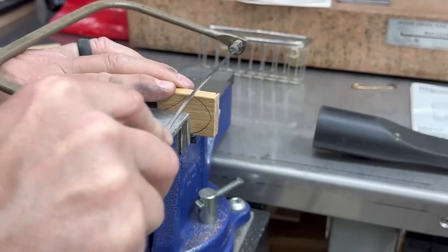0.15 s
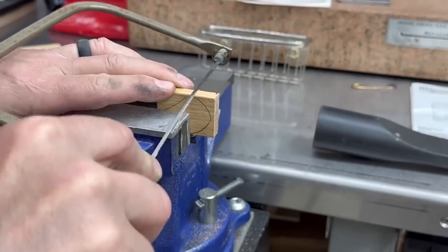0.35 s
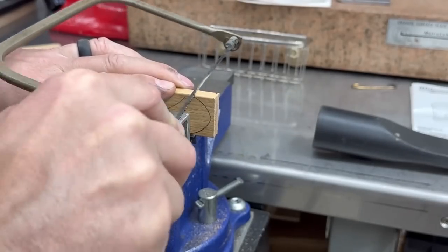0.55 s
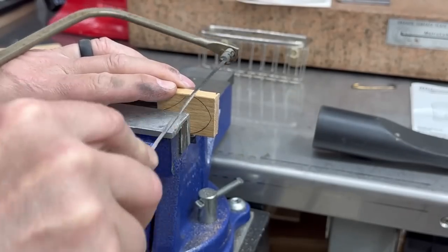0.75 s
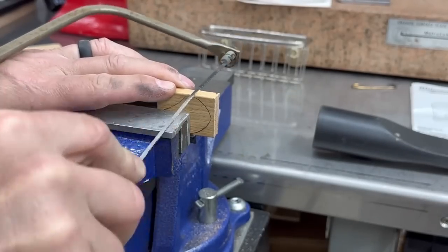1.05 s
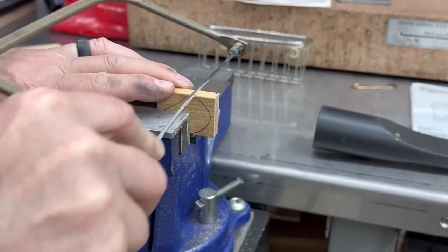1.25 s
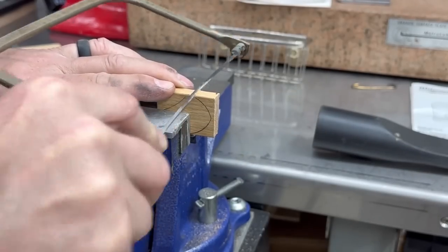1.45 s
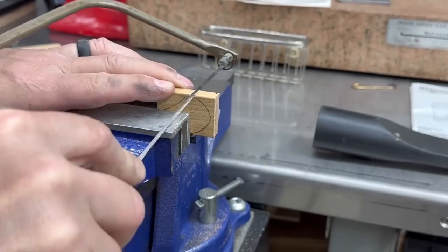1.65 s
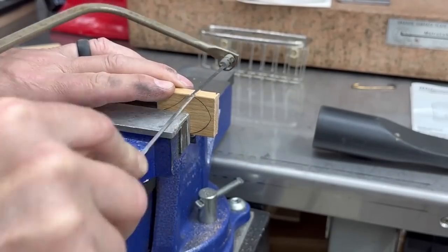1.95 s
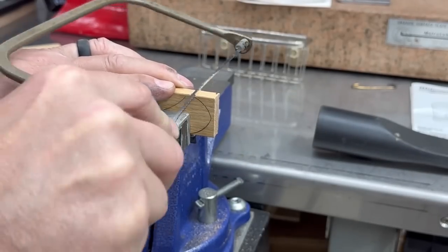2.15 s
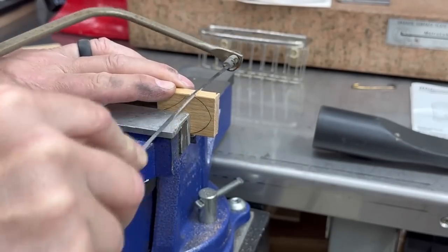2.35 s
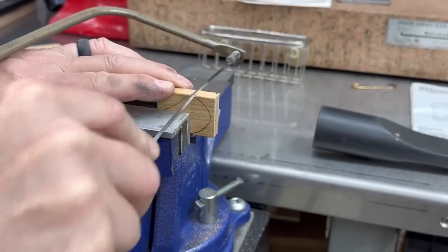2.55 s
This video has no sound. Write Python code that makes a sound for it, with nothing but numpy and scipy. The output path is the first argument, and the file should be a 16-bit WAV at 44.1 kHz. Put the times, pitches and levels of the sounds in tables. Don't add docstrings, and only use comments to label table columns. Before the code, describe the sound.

Fast, steady sawing of wood, already under way at the start: hissy, gritty rasps alternate slightly brighter and duller, growing a little louder, with a sharp fibre snap late on; close stereo, small dry workshop.

```python
import sys
import numpy as np
from scipy import signal
from scipy.fft import rfft, irfft
from scipy.io import wavfile
from scipy.ndimage import uniform_filter1d

SR = 44100
rng = np.random.default_rng(int(sys.argv[2]) if len(sys.argv) > 2 else 0)


def undo_db(level):
    steps = np.asarray(level, float) / 20
    return 10 ** steps


def int16_out(signal):
    q = np.round(np.clip(np.atleast_2d(signal).T, -1, 1) * 32767)
    wavfile.write(sys.argv[1], SR, q.astype(np.int16))


N = 119070

# frequency [Hz], level [dB].
RUMBLE_SPECTRUM = [(20, -48), (45, -6), (120, -0.5), (250, -6), (450, -21.5), (800, -25.5), (3500, -17.5),
                   (15000, -38)]
# frequency [Hz], likeness [0-1].
RUMBLE_LIKENESS = [(60, 1), (330, 0.91), (600, 0), (1500, 0.92), (5000, 0.98), (9000, 0.6)]
# start [s], level [dB], pitch [Hz].
BENCH_THUDS = [(0.039, -51.5, 99), (0.118, -56, 124), (.205, -50, 123), (0.275, -43, 94), (.555, -59, 110),
               (0.607, -44, 69), (0.646, -43.5, 150), (.791, -51.5, 118), (0.937, -54, 121),
               (1.256, -41.5, 121), (1.358, -45.5, 106), (1.567, -39, 117), (1.639, -46.5, 76.5),
               (1.899, -39.5, 120.5), (1.963, -47.5, 133), (2.211, -40, 121)]
# peak [s], rise [s], level [dB], pitch [Hz].
VISE_HUMS = [(.172, .04, -49.5, 236), (.525, .04, -50, 248), (0.68, .05, -49.5, 236),
             (0.859, .04, -50, 248.5), (0.938, .02, -49, 228), (1.011, .04, -47, 250),
             (1.187, .04, -48, 253.6), (1.313, .035, -44.5, 242.6), (1.5, .05, -48.5, 246.5),
             (1.574, .02, -52, 238), (1.637, .04, -47, 242), (1.92, .04, -52, 255.3), (2., .03, -52.5, 253),
             (2.162, .03, -51, 251.4), (2.25, .05, -46, 233.7), (2.312, .03, -62, 254),
             (2.482, .03, -50.5, 260), (2.567, .03, -53.5, 249.3), (2.615, .025, -53, 253)]
# start [s], length [s], level [dB].
FRAME_RINGS = [
    (0.982, 0.098, -57),
    (1.275, 0.13, -53.5),
]
# start [s], level [dB].
FIBRE_SNAPS = [
    (.329, -30),
    (.987, -29),
    (1.158, -29),
    (1.939, -17),
    (2.2, -29),
    (2.406, -28),
]
# start [s], length [s], level [dB], wood share [dB], low knock [dB].
SAW_STROKES = [(-.09, 0.13, -38, 1.5, 4), (.073, 0.13, -38, 0.5, 2.5), (.248, 0.13, -37.5, -0.5, 2),
               (.409, 0.14, -39, 0, -2), (.585, 0.14, -38, 1, 6.5), (.75, 0.14, -38, 1.5, 1),
               (.909, 0.13, -37, 2.5, 4), (1.075, 0.13, -37, 1, -3), (1.223, 0.13, -36.5, 0, -0.5),
               (1.385, 0.14, -36.5, -0.5, 1.5), (1.536, 0.14, -37, 0.5, 2), (1.709, 0.13, -35, -2, -2),
               (1.869, 0.13, -35.5, 0, 2.5), (2.036, .128, -34.5, 1.5, -1.5), (2.19, 0.13, -34, 2.5, 4.5),
               (2.352, 0.13, -35, 4.5, -1.5), (2.502, 0.13, -35, 2.5, 2.5), (2.663, 0.16, -34.5, -5, 0)]
# skew of the speed arch [exponent], steepness [exponent], bite [0-1], treble [dB].
STROKE_SHAPES = [
    (.9, 0.64, 0.39, -0.07),
    (1.05, 1., 0.31, -1.5),
]
# frequency [Hz], width [Hz], level [dB].
BLADE_MODES = [(2504, 53, -7), (2661, 97, -8), (3152, 90, 2), (3337, 58, 5.5), (3462, 85, 4),
               (3674, 40, 4.5), (3844, 130, -2.5), (4300, 114, -0.5), (4602, 91, -12), (4850, 40, -7),
               (5562, 50, -14), (6960, 67, -45), (13970, 250, -24), (15400, 130, -34)]
# frequency [Hz], width [Hz], level [dB].
BLOCK_MODES = [(378, 20, -8), (525, 42, -10.5), (653, 13.3, -14.5), (902.5, 15, -9), (1137, 52, -9),
               (1291, 8.3, -6.5), (1513, 36, -6.5), (1771, 45, -1), (2060, 78, -12)]
# frequency [Hz], level [dB].
TEAR_SPECTRUM = [(300, 1), (800, -23.5), (2200, 0), (3500, -1.5), (4800, 7.5), (6000, 3.64)]
# frequency [Hz], level [dB].
FIZZ_SPECTRUM = [(6000, 0), (7700, 0), (8300, 4.5), (8800, -1), (9800, -8), (12400, -15), (14500, -9)]
# centre [Hz], width [Hz], lead [radians].
BLADE_LEAD = [(3670, 840, 0.68)]
# frequency [Hz], lead [half turns].
TREBLE_LEAD = [(6750, 0), (7100, .2), (7450, .5), (7750, 1), (8800, 1), (9150, .62), (9800, .15),
               (10700, 0)]
# frequency [Hz], lead [half turns].
TOP_LEAD = [(13000, 0), (13600, -.25), (14300, -.3), (15000, -.57), (15400, -.9), (15700, -1)]
# frequency [Hz], level [dB].
PORT_BALANCE = [(60, .8), (300, 2.), (800, .8), (1300, 0.), (8000, 0.)]


def read(points, hz):
    f, v = np.transpose(points)
    return np.interp(np.log(hz + 1), np.log(f + 1), v)


def evened(x):
    return x / np.sqrt(np.mean(x ** 2) + 1e-20)


def add(mix, start, sound):
    at = round(start * SR)
    sound = sound[max(-at, 0):]
    part = mix[max(at, 0):][:len(sound)]
    part += sound[:len(part)]


def ring(x, modes):
    out = np.zeros(len(x))
    for k, (hz, width, db) in enumerate(modes):
        b, a = signal.iirpeak(hz, hz / max(width, 45), SR)
        out += (-1) ** k * undo_db(db) * signal.lfilter(b, a, x)
    return out


def colour(x, gain):
    return irfft(rfft(x) * gain(np.fft.rfftfreq(N, 1 / SR)), N)


def rumble():
    level_db, lump_db = -52.5, 1.4

    def shared_gain(hz):
        return undo_db(read(RUMBLE_SPECTRUM, hz))

    def apart_gain(hz):
        likeness = np.clip(read(RUMBLE_LIKENESS, hz), 0, .999)
        return shared_gain(hz) * np.sqrt((1 - likeness) / (1 + likeness))

    noise_a, noise_b = rng.standard_normal((2, N))
    pair = np.array([colour(noise_a, shared_gain), colour(noise_b, apart_gain)])
    slow = uniform_filter1d(uniform_filter1d(rng.standard_normal(N), 900), 900)
    lumps = undo_db(lump_db * evened(slow))
    return undo_db(level_db) * lumps * evened(pair) / np.sqrt(2)


def room(x):
    t60 = .15
    t = np.arange(SR // 3) / SR
    hits = rng.standard_normal(len(t)) * (rng.random(len(t)) < .05)
    tail = hits * undo_db(-60 * t / t60) * (t > .004)
    return signal.fftconvolve(x, tail / np.linalg.norm(tail))[:N]


def bench():
    rise_s, t60, lift_db = 0.02, 0.14, 2.5
    out = np.zeros(N)
    t = np.arange(0, .2, 1 / SR)
    swell = np.sin(np.minimum(t / rise_s, 1) * np.pi / 2) ** 2
    decay_db = -60 * np.maximum(t - rise_s, 0) / t60
    for start, db, hz in BENCH_THUDS:
        add(out, start - .01, undo_db(db + lift_db + decay_db) * swell * np.sin(2 * np.pi * hz * t))
    return out


def vise():
    lift_db, rough, glide, fall = 4, 0.11, .045, 0.66
    out = np.zeros(N)
    for peak, rise, db, hz in VISE_HUMS:
        t = np.arange(-2 * rise, 2 * rise, 1 / SR)
        u = t / rise
        swell = np.exp(-np.where(u < 0, u, u / fall) ** 2)
        wobble = 1 + rough * evened(uniform_filter1d(rng.standard_normal(len(t)), 500))
        phase = 2 * np.pi * np.cumsum(hz * (1 + glide * u)) / SR
        add(out, peak - 2 * rise, undo_db(db + lift_db) * swell * wobble * np.sin(phase))
    return out


def frame():
    pitch_hz = 1268
    out = np.zeros(N)
    for start, length, db in FRAME_RINGS:
        t = np.arange(0, length, 1 / SR)
        swell = np.sin(np.pi * (t / length) ** 0.51)
        add(out, start, undo_db(db) * swell * np.sin(2 * np.pi * pitch_hz * t))
    return out


def snaps():
    pitch_hz, t60, attack_s = 3270, 0.018, 0.00036
    out = np.zeros(N)
    t = np.arange(1200) / SR
    pair = np.sin(2 * np.pi * pitch_hz * t) + .5 * np.sin(2 * np.pi * 1.1 * pitch_hz * t)
    for start, db in FIBRE_SNAPS:
        add(out, start, undo_db(db - 60 * t / t60) * np.minimum(t / attack_s, 1) * pair)
    return out


def strokes():
    blade, wood, treble, knock = np.zeros((4, N))
    for k, (start, length, db, wood_db, knock_db) in enumerate(SAW_STROKES):
        skew, steep, bite, treble_db = STROKE_SHAPES[k % 2]
        u = np.arange(0, length, 1 / SR) / length
        speed = abs(np.sin(np.pi * u ** skew)) ** steep
        first_bite = bite * (1 - u) * np.minimum(u / 0.022, 1)
        arch = undo_db(db) * np.maximum(speed, first_bite)
        for lane, lift_db in ((blade, 0), (wood, wood_db), (treble, treble_db), (knock, knock_db)):
            add(lane, start, arch * undo_db(lift_db))
    return blade, wood, treble, knock


def teeth():
    ticks_per_s, spread_db, rub = 2600, 2, 0.67
    chatter_db, chatter_s = -1.5, 0.0041
    slow = evened(uniform_filter1d(rng.standard_normal(N), round(chatter_s * SR)))
    chatter = undo_db(chatter_db * np.tanh(slow / 2) * 2)
    strength = undo_db(spread_db * np.minimum(rng.exponential(1, N), 3))
    ticks = strength * (rng.random(N) < ticks_per_s / SR) * rng.choice([-1., 1.], N)
    return evened(chatter * (evened(ticks) + rub * rng.standard_normal(N)))


def saw():
    tear_db, wood_db = -16.5, -17
    blade, wood, treble, knock = strokes()
    drive = teeth()
    scale = 1 / np.sqrt(np.mean(ring(drive, BLADE_MODES) ** 2))
    tear = scale * colour(drive, lambda hz: undo_db(read(TEAR_SPECTRUM, hz) + read(FIZZ_SPECTRUM, hz)))
    low = [mode for mode in BLOCK_MODES if mode[0] < 1000]
    high = BLOCK_MODES[len(low):]
    block = ring(drive * knock, low) + ring(drive * wood, high)
    bodies = ring(drive * blade, BLADE_MODES) + undo_db(wood_db) * 4 * block
    return scale * bodies + undo_db(tear_db) * tear * treble


def ports(x):
    top_hz, top_slope_hz = 15350, 170
    scatter_rad, patch_db = .8, 1.8

    def drift(v):
        return evened(uniform_filter1d(uniform_filter1d(v, 4, 0), 6, 1))

    hz, _, z = signal.stft(x, SR, nperseg=512, noverlap=384)
    patch, sway = (drift(v) for v in rng.standard_normal((2,) + z.shape))
    lead = sum(rad * np.exp(-((hz - centre) / width) ** 2) for centre, width, rad in BLADE_LEAD)
    lead = lead + np.pi * (read(TREBLE_LEAD, hz) + read(TOP_LEAD, hz))
    scatter = scatter_rad * np.sin(lead) * np.where(hz < 6000, .4, 1)
    lead = lead[:, None] + scatter[:, None] * sway
    roll_off = 1 + np.exp(np.clip((hz - top_hz) / top_slope_hz, -50, 50))
    z = z * undo_db(patch_db * patch * (hz > 600)[:, None]) / roll_off[:, None]
    half = undo_db(read(PORT_BALANCE, hz) / 2)[:, None] * np.exp(.5j * lead)
    return signal.istft(np.array([z * half, z / half]), SR, nperseg=512, noverlap=384)[1][:, :N]


def scene():
    room_db, diffuse = -17, .45
    shared, apart = rumble()
    cut = saw() + snaps()
    held = bench() + vise() + frame()
    near = ports(cut + undo_db(room_db) * room(cut) + held + (1 - diffuse) * shared)
    return near + diffuse * shared + np.array([apart, -apart])


def top_cut(x):
    return signal.sosfilt(signal.butter(12, 15990, fs=SR, output="sos"), x)


def record(dry):
    return top_cut(dry)


dry = scene()
out = record(dry)
int16_out(out)
```